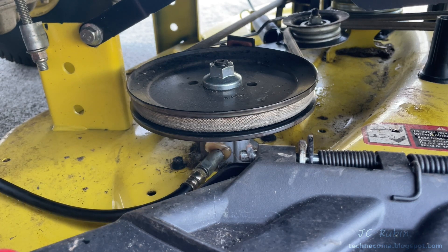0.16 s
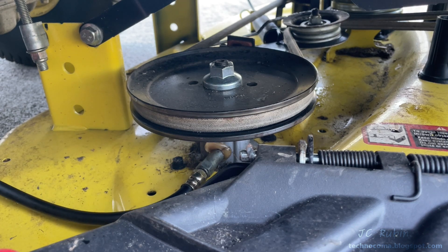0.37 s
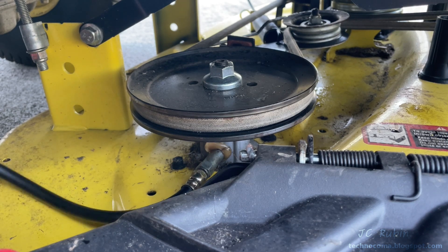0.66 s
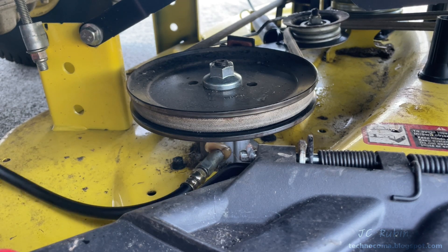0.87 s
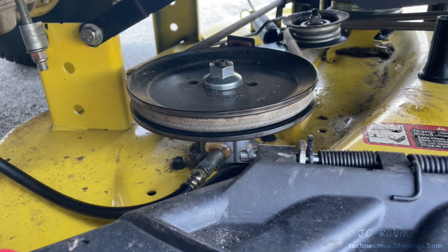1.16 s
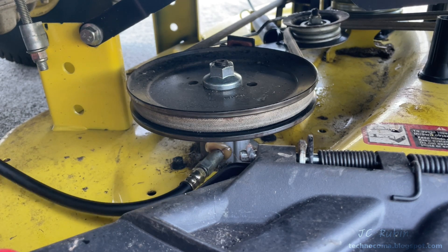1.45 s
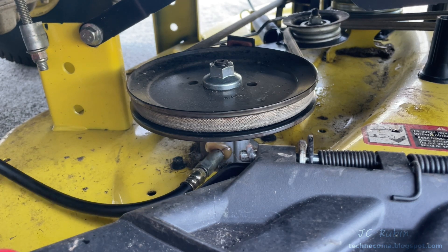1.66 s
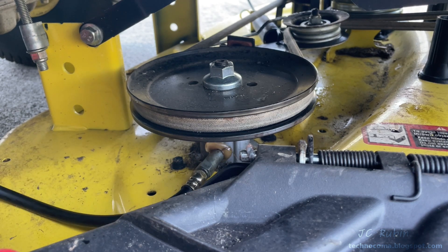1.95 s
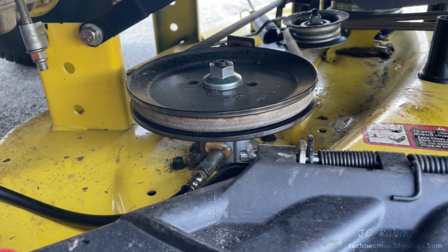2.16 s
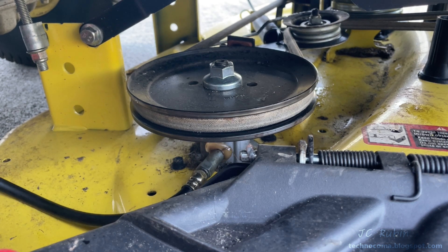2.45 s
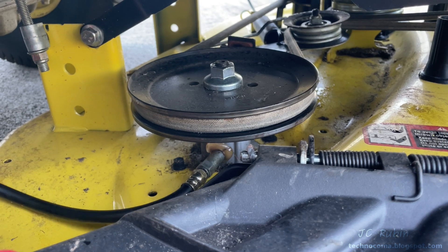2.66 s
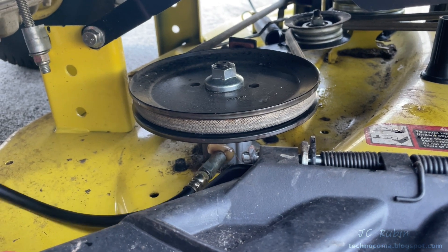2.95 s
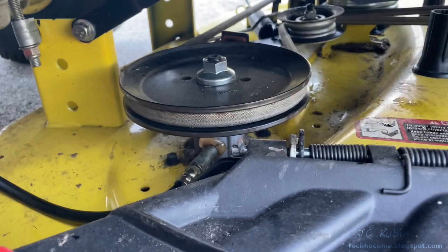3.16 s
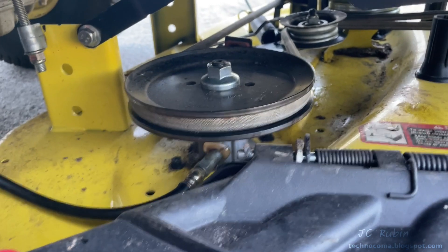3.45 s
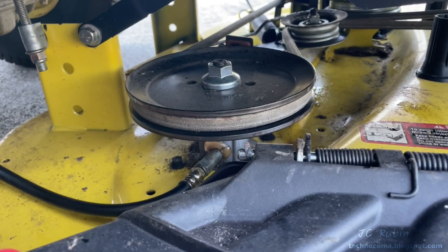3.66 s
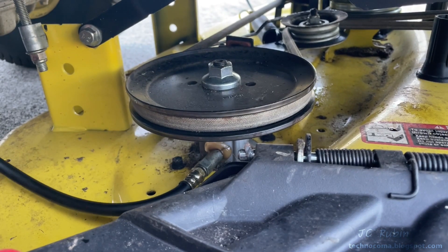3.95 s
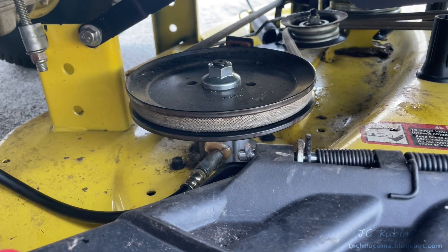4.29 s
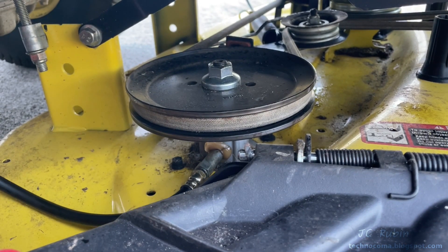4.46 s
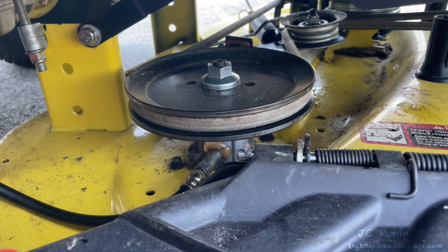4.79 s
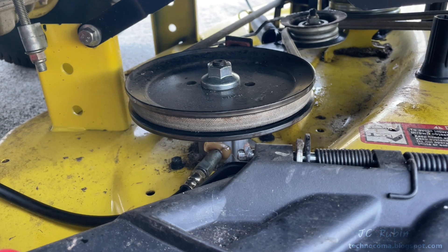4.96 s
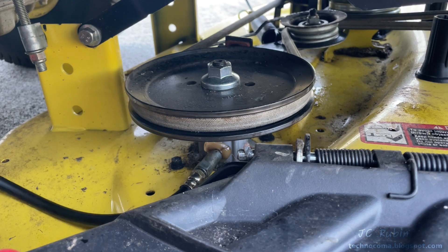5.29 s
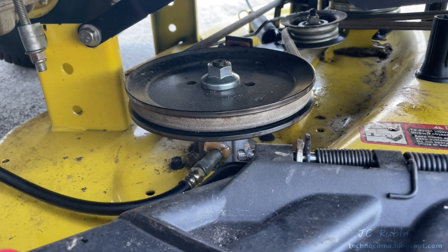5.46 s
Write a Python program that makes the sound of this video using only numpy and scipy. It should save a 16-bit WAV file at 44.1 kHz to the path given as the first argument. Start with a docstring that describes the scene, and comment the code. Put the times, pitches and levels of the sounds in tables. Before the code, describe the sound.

Outdoors, a close stereo microphone hears a hand grease gun over a soft, steady bed of distant traffic rumble. After near quiet, a firm steel clack at 0.7 s leaves a faint thin ring, followed by lighter ticks and a clatter from 0.9 to 1.1 s. Another tight rattle comes at 1.35 s, then a lull with only faint rubbing. A small click at 2.4 s leads into scattered clacks from 2.55 to 2.9 s. At 3.0 s bumps on the microphone stand make the loudest event, a dull, fast-falling thump with a short low hum. Clacks resume at 3.35-3.5 s, one ringing more clearly, and again at 3.7-3.85 s. Gritty soft hiss swells around the strokes. It stays quiet from about 3.9 s, with thin hiss near 5 s and faint ticks, until a last brisk metallic rattle at 5.4-5.5 s. Every clack is dry and short.

```python
"""Hand grease gun at work outdoors

The gun's lever, link and plunger clack in short rattles: bursts of noisy contact force ring the modes of its steel body.
Now and then the lever sings on as one slender mode. Spells of soft hiss, mostly from rubbing rod and hose, are bands of
gritty noise. Knocks on the microphone stand are falling sines with a shudder, and leave the stand humming. Far traffic
rumbles below as banded noise. A mower deck and the ground scatter a short tail after each clack. Two ports give stereo."""
import sys
import numpy as np
from scipy import signal
from scipy.io import wavfile
from scipy.ndimage import uniform_filter1d

SR = 44100
rng = np.random.default_rng(int(sys.argv[2]) if len(sys.argv) > 2 else 0)


def put_to_file(sound):
    """Save the sound as 16-bit audio at rate SR, in the file named by the first command-line argument."""
    columns = np.atleast_2d(sound).T  # one column per channel
    safe = np.clip(columns, -1, 1)
    whole_steps = np.round(safe * 32767)
    wavfile.write(sys.argv[1], SR, whole_steps.astype(np.int16))


N = 248016

# Clacks of the gun. Each row: first contact in seconds, level in dB before the group drive, thud in dB relative to it,
# hardness (extra brightness) in dB before the group shares, time for the rattle to reach its height in ms.
CLACKS = [(0.039, -65, -8, 5, 2.2), (0.499, -56, -23, -28, 1.4), (0.684, -16, -14.5, -23, 1.7),
          (0.6904, -33, -17, -6.5, 1.3), (0.7091, -33.5, -11, -19, 5.8), (.721, -33.5, -17, -14, .9),
          (0.731, -34.5, -5.5, -10, 1), (.772, -29, -15.5, -6.5, 1.84), (0.918, -40, -40, -11, 1.1),
          (0.938, -23.5, -11, -4.5, 0.98), (0.9797, -23, -12.5, -24, 1.3), (1.0224, -21, -18.5, -8, 1.8),
          (1.0302, -31.5, -3, 2.5, 0.94), (1.04, -21.5, -12, -3.5, 1.56), (1.0795, -33.5, -2.5, -37, 1.3),
          (1.3372, -19, -14.5, -7.5, 1.7), (1.3541, -18.5, -20, -10, 1.1),
          (1.3652, -21.5, -21.5, -17, 0.66), (1.3718, -24, -14, -7.5, 0.46),
          (1.3874, -32.5, -26.5, -7, 1.2), (1.397, -35.5, -29, -11.5, 1.8), (2.0374, -60, -6, 15.5, 0.69),
          (2.402, -33, -10, -12, .75), (2.5391, -20.5, -11.5, -20.5, .8),
          (2.5522, -23.5, -11.5, -10.5, 0.92), (2.574, -33, -13, -8, 1.1), (2.609, -21.5, -14, -9.5, 1.8),
          (2.644, -47, -4, -27, 1.6), (2.6645, -29, -30, -10, 1.14), (2.6773, -37.5, -13, -15, 3.9),
          (2.6923, -34, -15, -11, 1.75), (2.7715, -46, -20, -39, 1.2), (2.837, -28.5, -26, -10, 0.68),
          (2.8482, -34.5, -37, -10, 1.9), (2.8701, -23, -17.5, -8.5, 1.07), (2.9351, -46, 8.5, -18, 0.37),
          (2.957, -40, 4, -32, 1.05), (3.0131, -28.5, 3.5, 5.5, 0.32), (3.0234, -27.5, 6.5, -6, 0.98),
          (3.0304, -36, 6, -7, 2.1), (3.3424, -27, -2, -13.5, 1.4), (3.3788, -36, -1, -20, 1.5),
          (3.3946, -24, -29, -8.5, 0.41), (3.4029, -21.5, -12.5, -8, 1.2), (3.4167, -30, -3.5, -6, .9),
          (3.4321, -34, -11, -22, 1.2), (3.4412, -44, -11, -24, 1.2), (3.4814, -15.5, -14.5, -19.5, 0.82),
          (3.5268, -38.5, -17, -20, 1.6), (3.722, -28.5, -13.5, -4, 0.87), (3.7398, -26.5, -10, -9, 1.15),
          (3.8072, -16, -12.5, -8, 1.18), (3.8263, -32, -14, -15, 1.2), (3.839, -38, -15, -14, 1.5),
          (3.8541, -34, -11.5, -26, 1.2), (4.144, -61, 3, -6, 0.91), (4.824, -59, 9, -10, 1.08),
          (4.9308, -58.5, 0, 19.5, 0.84), (5.1253, -47, -21, -18.5, 2.2), (5.2446, -35.5, -7, -5.5, 2.03),
          (5.3827, -22.5, -10.5, -26.5, 0.93), (5.3896, -25, -7.5, -8.5, 1.2),
          (5.3969, -23, -11, -2.5, .41), (5.4131, -30, -11.5, -7, .94), (5.477, -21, -14.5, -8.5, 1.63),
          (5.5038, -23, -13, -5, 1.32)]
# Modes of the steel body, in five groups from thud to top. Each row: nominal pitch in Hz, typical level in dB
# within its group, undamped time to fall by 60 dB in seconds.
BODY_MODES = [
    [(194, -6, 0.024), (390, -6.5, 0.016), (600, 5, 0.011), (926, -7.5, 0.021), (1167, -2.5, 0.0092)],
    [(1540, -8, .009), (2012, 8, 0.0064), (2190, -5, 0.0052), (2370, -13, 0.0069)],
    [(3273, 2, 0.033), (3754, 0.5, .01), (4470, -9, 0.015)],
    [(5530, -6, 0.024), (6160, 2, 0.004), (7030, -4.5, 0.0059), (7220, -13, 0.015)],
    [(9430, -8, 0.00047), (10100, 3.5, .005), (11600, -9.5, 0.0029), (14600, -11.5, 0.0032)],
]
# Drive of each body group. Each entry: level in dB.
GROUP_DRIVE_DB = [-2, -7, -2, -0.5, -7.5]
# Borders between the body groups. Each entry: frequency in Hz.
GROUP_EDGES_HZ = [140, 1350, 2800, 5100, 8600, 15500]
# How far the three upper groups follow the hardness. Each entry: factor on the hardness in dB.
HARDNESS_SHARE = [0.45, 0.96, 1.3]
# Strikes that set the lever singing. Each row: start in seconds, level in dB before the port gains.
LEVER_STRIKES = [(.685, -49), (.775, -56.5), (1.373, -63), (3.483, -42.5)]
# Knocks that reach the microphone through its stand. Each row: start in seconds, level in dB before the port gains,
# first pitch in Hz, last pitch in Hz, decay in ms, shudder as a share from 0 to 1.
KNOCKS = [(.738, -40.5, 480, 190, 8, 0.6), (2.936, -38, 1040, 308, 9, .8), (3.009, -27, 804, 500, 3, .5),
          (3.0133, -4.5, 1153, 120, 5.4, 0.5), (3.0253, -10.5, 1185, 130, 5, 0.3),
          (3.0337, -15, 1113, 150, 4, .4), (3.0389, -17.5, 512, 130, 8, .2), (3.060, -40, 900, 497, 5, 0.5),
          (3.315, -46, 490, 153.5, 8, .3), (3.322, -36.5, 797, 86.5, 14, 0.34),
          (5.261, -44, 820, 400, 16, .99)]
# Hum of the stand, alike at both ports. Each row: pitch in Hz, level in dB relative to the knock,
# time to fall by 60 dB in seconds.
STAND_MODES = [(106.6, -19, 0.23), (160.3, -12.5, 0.057), (203, -11, 0.095), (248, -9, 0.07),
               (346, -22.5, 0.091)]
# Sideways modes, opposite at the two ports. Each row: pitch in Hz, level in dB relative to the knock and before
# the band filter, time to fall by 60 dB in seconds.
SWAY_MODES = [(840, -5, .05), (1000, -13, .03), (470, -15, .035)]
# Spells of soft hiss, mostly from rubbing rod and hose. Each row: time of full level in seconds, rise in seconds,
# hold in seconds, level in dB, low scrape in dB relative to the level, high hiss in dB relative to the level.
HISS_SPELLS = [(.001, .04, 0.1, -71.5, 3, -1), (.27, .08, 0.018, -70.5, 3.5, 0),
               (.56, 0.059, .11, -66, 10, 6), (.74, 0.069, 0.14, -71, 7.5, 2),
               (1.0, .1, 0.065, -61, 0, -7.5), (1.2, .2, .13, -59, -2.5, -5),
               (1.39, 0.11, .01, -56.5, 4.5, -11.5), (1.43, 0.041, .08, -76, 3, -6),
               (1.65, .02, 0.0017, -82, -1, 0), (2.05, 0.16, 0.052, -72.5, 2.5, 1),
               (2.2, 0.15, 0.035, -72.5, 6, 7.5), (2.36, .06, .04, -62, 3.5, 3),
               (2.6, 0.15, 0.078, -59.5, 6.5, 0.5), (3.0, .3, 0.54, -67, -1, 7),
               (3.43, 0.14, .005, -52.5, 3.5, -3), (3.66, .26, .19, -56.5, -0.5, -4.5),
               (4.12, 0.12, 0.084, -74.5, 8.5, -1), (4.2, 0.11, .04, -66.5, 3, 0.5),
               (4.83, 0.01, 0.09, -73, 1, 9.5), (4.94, 0.043, 0.6, -62.5, -1, 6.5),
               (5.45, .2, .02, -57, 6, -3.5), (5.55, 0.077, .1, -63, 5, 4.5)]
# Faint rustle between the spells. Entries: level in dB of scrape, middle and hiss.
REST_DB = [-81, -87.5, -87]
# Colour of the rubbing as picked up by the microphone. Each row: frequency in Hz, relative density in dB per Hz.
RUB_COLOUR = [(880, -40), (1500, -6), (1720, -12.5), (2190, -2), (3150, -6.5), (5880, -4.5), (8660, -12.5),
              (9370, -20), (11400, -7), (12500, -18), (13000, -49), (14300, -20), (16000, -24.5)]
# Colour of the far traffic. Each row: frequency in Hz, relative density in dB per Hz.
RUMBLE_COLOUR = [(12, -58), (20, -38.5), (48, -1), (106, -3.5), (142, -12), (175, -11.5), (368, -25.5),
                 (405, -20), (478, -19.5), (1100, -26), (1950, -45.5), (2200, -55.5), (6000, -84.5),
                 (7800, -97), (13200, -120)]
# Level of the far traffic. Each row: time in seconds, level in dB.
RUMBLE_LEVEL = [(0.0, -47.5), (.3, -49), (1.6, -49.5), (3.49, -46), (4.75, -49.5), (5.3, -47),
                (5.62, -47.5)]
# Likeness of the noise at the two ports. Each row: frequency in Hz, correlation from -1 to 1 before the upper limit.
LIKENESS = [(60, 1), (180, 0.8), (550, -0.27), (1650, -0.29), (4970, 0.013), (15000, 0.51)]

LEVER_HZ, LEVER_T60_S = 2116, 0.37
PORT_LAG_S, PORT_TILT_DB = 0.00046, 0.6   # right port later; left raised and right lowered by the tilt
SHARED = 0.7                              # share of the contact force power common to both ports
ECHO_DB, ECHO_MS = -10, 12                # size and decay of the tail scattered by the deck and the ground
LONGEST_T60_S = 0.016                     # the hand damps everything above the thud
HARD_CONTACT = 2.2                        # extra force of the hardest contact in a rattle
GLIDE_MS = 5.2                            # time of the fall in pitch of a knock
SWELL_DB = 20                             # climb during the rise of a hiss spell
SAG_DB_PER_S, RELEASE_DB_PER_S = 6, 232   # sag while it holds, fall afterwards
SING_WANDER_DB = 3.5                      # drift of each singing mode
MOST_ALIKE = 0.89                         # even the deepest rumble differs a little between the ports
LOW_CUT_HZ, CUTOFF_HZ = 32, 16900


def from_db(db):
    """Turns decibels into an amplitude factor."""
    return 10 ** (np.asarray(db) / 20)


def rms_one(x):
    """Scales a sound to an rms of 1."""
    return x / np.sqrt(np.mean(x ** 2) + 1e-20)


def at_hz(points, hz):
    """Reads a curve over frequency, with straight lines on a log scale."""
    curve_hz, value = np.transpose(points)
    return np.interp(np.log(hz), np.log(curve_hz), value)


def band_filter(order, edges_hz):
    """Designs a band-pass filter between two frequencies."""
    return signal.butter(order, edges_hz, "band", fs=SR, output="sos")


def add(track, s, sound):
    """Mixes a short sound in at time s."""
    i = round(s * SR)
    track[..., i:i + sound.shape[-1]] += sound[..., :N - i]


def drift(rate_hz):
    """Random wander of spread 1: noise smoothed at a fortieth of the sample rate, then drawn out."""
    r = np.exp(-80 * np.pi * rate_hz / SR)
    noise = rng.standard_normal(N // 40 + 2002)
    slow = signal.lfilter([1], [1, -2 * r, r * r], noise)[2000:]   # drop the filter's run-in
    return np.interp(np.arange(N) / 40, np.arange(len(slow)), rms_one(slow))


def ring(force, hz, t60_s):
    """Damped resonance: a unit click sets a decaying sine of height 1 ringing."""
    r = from_db(-60 / (t60_s * SR))
    w = 2 * np.pi * hz / SR
    return signal.lfilter([0, np.sin(w)], [1, -2 * r * np.cos(w), r * r], force)


def later_right(x, lag_s):
    """The right port hears the sound a little later and softer."""
    n = np.arange(N)
    left = x[0] * from_db(PORT_TILT_DB)
    right = np.interp(n - round(lag_s * SR), n, x[1]) / from_db(PORT_TILT_DB)
    return np.array([left, right])


def noise_bands(spectrum, lowest_hz, per_octave, count, patchy_db):
    """Narrow bands of stereo noise, each with its level, flicker and likeness; rms 1 together."""
    edges = np.minimum(lowest_hz * 2 ** (np.arange(count + 1) / per_octave), 0.45 * SR)
    white = rng.standard_normal((2, 2, N))
    bands = []
    for k, (low, high) in enumerate(zip(edges, edges[1:])):
        centre_hz = np.sqrt(low * high)
        # neighbouring bands use different noise
        mid, side = signal.sosfilt(band_filter(2, [low, high]), white[k % 2])
        alike = np.minimum(at_hz(LIKENESS, centre_hz), MOST_ALIKE)
        gain = from_db(at_hz(spectrum, centre_hz) + patchy_db * drift(21))
        bands.append(gain * (np.sqrt(1 + alike) * mid + np.sqrt(1 - alike) * side * [[1], [-1]]))
    return np.array(bands) / np.sqrt(np.mean(np.sum(bands, axis=0) ** 2))


def contact_force(ms, rattle_ms, creep_db, creep_ms):
    """Noisy force of one rattle of contacts, partly shared by the two ports."""
    common = rng.standard_normal(len(ms))
    own = rng.standard_normal((2, len(ms)))
    before, after = np.minimum(ms, 0), np.maximum(ms, 0)
    age = after / rattle_ms
    rattle = age * np.exp(1 - age)
    rattle += from_db(creep_db) * np.exp(before / creep_ms - age)      # the parts slide just before they meet
    rattle += from_db(ECHO_DB) * np.exp(-after / ECHO_MS) * (ms > 0)   # scattered back by the deck and the ground
    hardest = np.argmax(rattle)
    common[hardest] += HARD_CONTACT * np.sign(common[hardest])         # one hard contact stands out
    return rattle * (np.sqrt(SHARED) * common + np.sqrt(1 - SHARED) * own)


def strike_group(force, modes, band, longest_s, spread_db, detune):
    """The force rings one group of body modes; the grip shifts their pitch and level at every clack."""
    rung = np.zeros_like(force)
    chance = rng.standard_normal((len(modes), 2))
    for (hz, level_db, t60_s), (louder, sharper) in zip(modes, chance):
        tone = ring(force, hz * (1 + detune * sharper), min(t60_s, longest_s))
        rung += from_db(level_db + spread_db * louder) * tone
    rung = signal.sosfilt(band, rung)
    loudest = np.sqrt(uniform_filter1d(np.mean(rung ** 2, axis=0), size=88).max())   # over about 2 ms
    return rung / loudest


def clacks(spread_db=4.5, detune=0.032, creep_db=-13, creep_ms=3.2):
    """Each clack is a short rattle of contacts that strikes every mode of the body with its own strength."""
    bright, thud = np.zeros((2, N)), np.zeros((2, N))
    ms = np.arange(-441, 2600) / SR * 1000
    bands = [band_filter(2, edges) for edges in zip(GROUP_EDGES_HZ, GROUP_EDGES_HZ[1:])]
    for s, db, thud_db, hard_db, rattle_ms in CLACKS:
        force = contact_force(ms, rattle_ms, creep_db, creep_ms)
        colours_db = [thud_db, 0, *np.multiply(HARDNESS_SHARE, hard_db)]
        for k, (modes, colour_db, drive_db, band) in enumerate(zip(BODY_MODES, colours_db, GROUP_DRIVE_DB, bands)):
            track, longest_s = (thud, 1) if k == 0 else (bright, LONGEST_T60_S)
            rung = strike_group(force, modes, band, longest_s, spread_db, detune)
            add(track, s + ms[0] / 1000, from_db(db + colour_db + drive_db) * rung)
    # the thud also travels in the deck, so it reaches the right port sooner
    return later_right(bright, PORT_LAG_S) + later_right(thud, PORT_LAG_S / 2)


def lever():
    """One slender mode keeps singing after some strikes, a little louder at the left port."""
    clicks = np.full(N, 1e-18)   # a tiny offset keeps the filter out of vanishing numbers
    for s, db in LEVER_STRIKES:
        clicks[round(s * SR)] = from_db(db)
    port_gains = from_db([[1], [-1]])
    return ring(clicks, LEVER_HZ, LEVER_T60_S) * port_gains


def knocks(lag_s=0.000097):
    """Bending waves in the stand: high pitches arrive first, so each knock falls in pitch, then the stand hums."""
    out = np.zeros((2, N))
    shakes = np.full(N, 1e-18)
    ms = np.arange(4096) / SR * 1000
    shudder_band = band_filter(4, [180, 1350])
    for s, db, first_hz, last_hz, decay_ms, rough in KNOCKS:
        hz = last_hz + (first_hz - last_hz) * np.exp(-(ms / GLIDE_MS) ** 1.4)
        swell = (1 - np.exp(-ms / 0.78)) * np.exp(-ms / decay_ms)
        wave = swell / swell.max() * np.sin(2 * np.pi * np.cumsum(hz) / SR)
        shudder = rms_one(signal.sosfilt(shudder_band, rng.standard_normal((2, len(ms)))))
        shudder *= (1 - np.exp(-ms / 5.3)) * np.exp(-ms / (1.2 * decay_ms))
        add(out, s, from_db(db) * (wave + rough * shudder))
        shakes[round((s + 0.004) * SR)] = from_db(db)
    hum = sum(from_db(db) * ring(shakes, hz, t60_s) for hz, db, t60_s in STAND_MODES)
    early_shakes = np.roll(shakes, -150)   # the sway starts 3.4 ms ahead of the hum
    sway = sum(from_db(db) * ring(early_shakes, hz, t60_s) for hz, db, t60_s in SWAY_MODES)
    sway = signal.sosfilt(band_filter(2, [400, 1200]), sway)   # a soft, padded push
    port_gains = from_db([[1.1], [-1.1]])   # left a little louder still
    return later_right(out, lag_s) * port_gains + hum + sway * np.array([[1], [-1]])


def rubbing(grit_db=1.0, sing_db=-5, sing_t60_s=0.022):
    """Fine, gritty hiss, mostly friction of rod and hose, that faintly sings in the body's modes."""
    scrape, middle, hiss = hiss_spells()
    bands = noise_bands(RUB_COLOUR, 1500, per_octave=4, count=14, patchy_db=1.5)
    mix = scrape * bands[:5].sum(axis=0)
    mix += middle * bands[5:10].sum(axis=0)
    mix += hiss * bands[10:].sum(axis=0)
    sung = np.zeros((2, N))
    for modes in BODY_MODES[1:4]:
        for hz, _, _ in modes:
            sung += ring(mix, hz, sing_t60_s) * from_db(SING_WANDER_DB * drift(2))
    mix = mix + from_db(sing_db) * rms_one(sung) * np.sqrt(np.mean(mix ** 2))
    return from_db(grit_db * drift(70)) * mix


def hiss_spells():
    """Gain of low scrape, middle and high hiss: every spell swells, sags a little and falls away fast."""
    power = from_db(REST_DB)[:, None] ** 2
    for s, rise_s, hold_s, db, scrape_db, hiss_db in HISS_SPELLS:
        t = np.arange(N) / SR - s
        shape_db = np.minimum(t, 0) * SWELL_DB / rise_s
        shape_db -= SAG_DB_PER_S * np.clip(t, 0, hold_s)
        shape_db -= RELEASE_DB_PER_S * np.maximum(t - hold_s, 0)
        colour_db = np.array([[scrape_db], [0], [hiss_db]])
        power = power + from_db(np.maximum(shape_db, -99) + db + colour_db) ** 2
    return np.sqrt(power)


def traffic():
    """Far traffic: a deep bed of banded noise whose level drifts slowly."""
    s, level_db = np.transpose(RUMBLE_LEVEL)
    rumble = noise_bands(RUMBLE_COLOUR, 22, per_octave=2, count=16, patchy_db=0.6).sum(axis=0)
    return from_db(np.interp(np.arange(N) / SR, s, level_db)) * rumble


def scene():
    """Mixes the gun, the stand, the rubbing and the traffic."""
    return clacks() + lever() + knocks() + rubbing() + traffic()


def record(dry):
    """The deepest bass is cut, peaks are rounded, then the top is cut."""
    thinned = signal.sosfilt(signal.butter(2, LOW_CUT_HZ, "high", fs=SR, output="sos"), dry)
    rounded = 1.193 * np.tanh(thinned / 1.23)
    return signal.sosfilt(signal.cheby2(12, 70, CUTOFF_HZ, fs=SR, output="sos"), rounded)


dry = scene()
out = record(dry)
put_to_file(out)
```